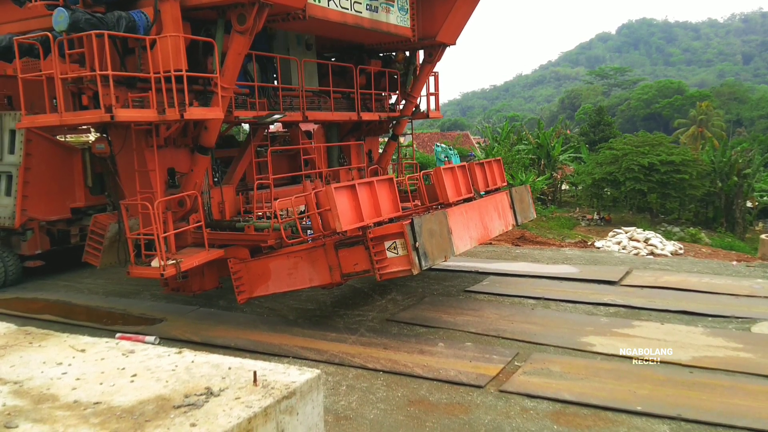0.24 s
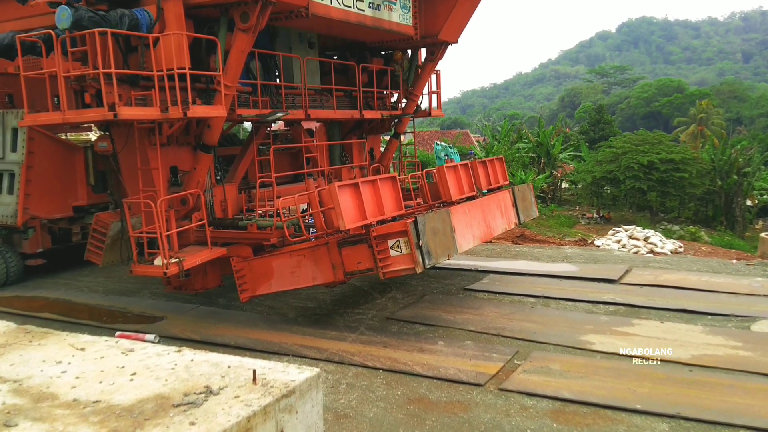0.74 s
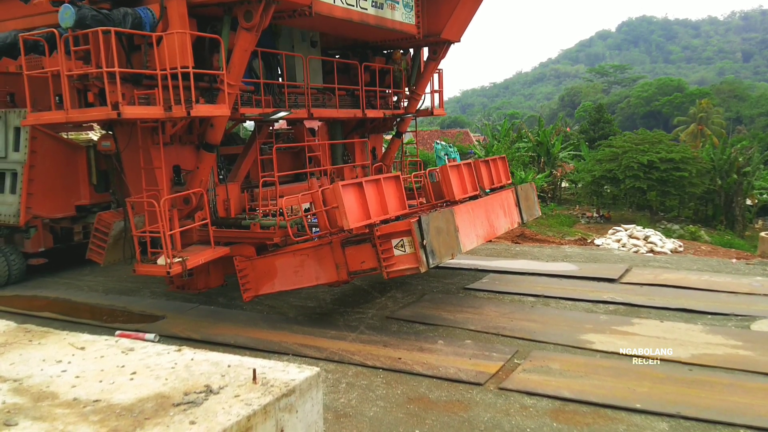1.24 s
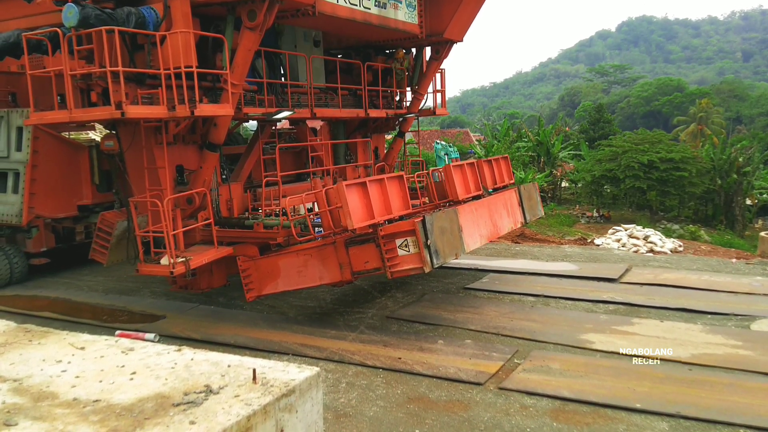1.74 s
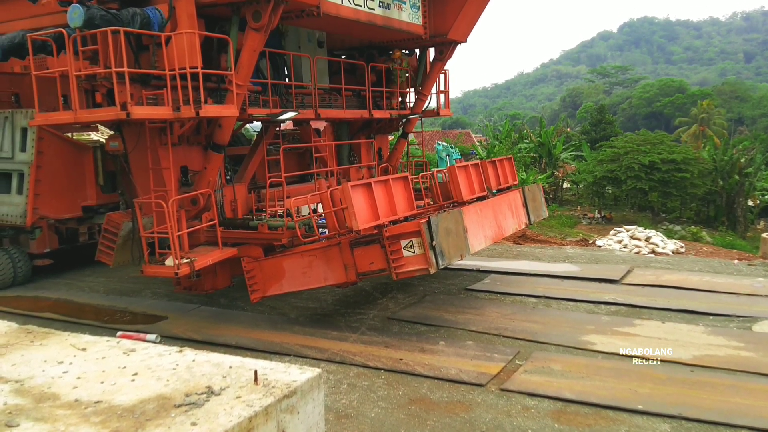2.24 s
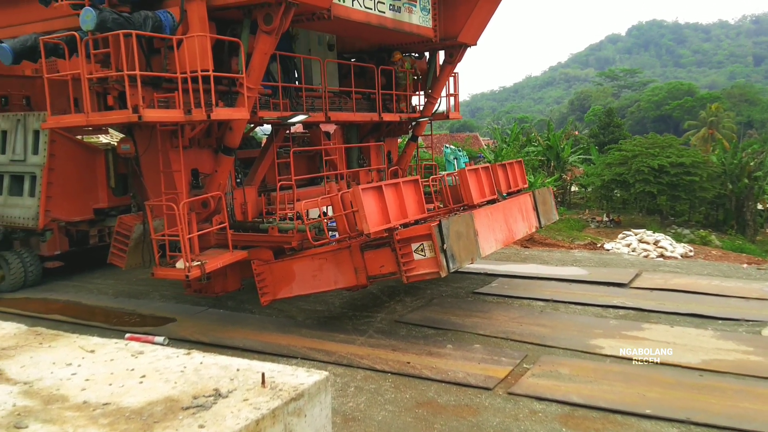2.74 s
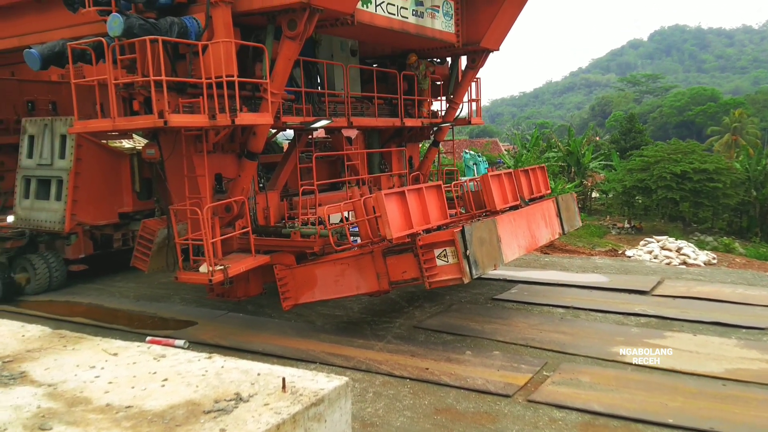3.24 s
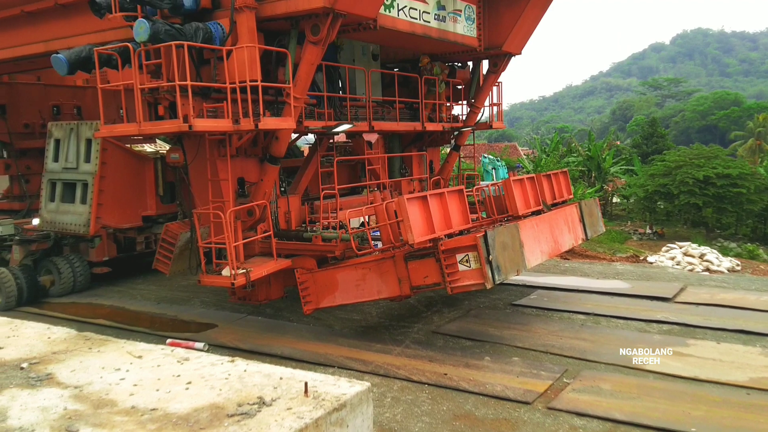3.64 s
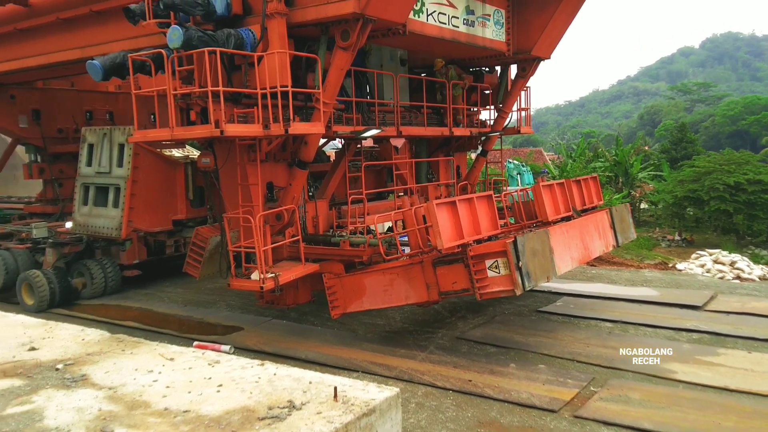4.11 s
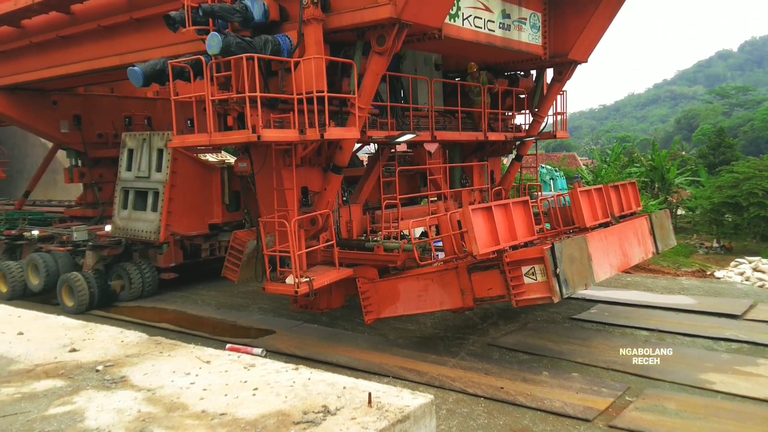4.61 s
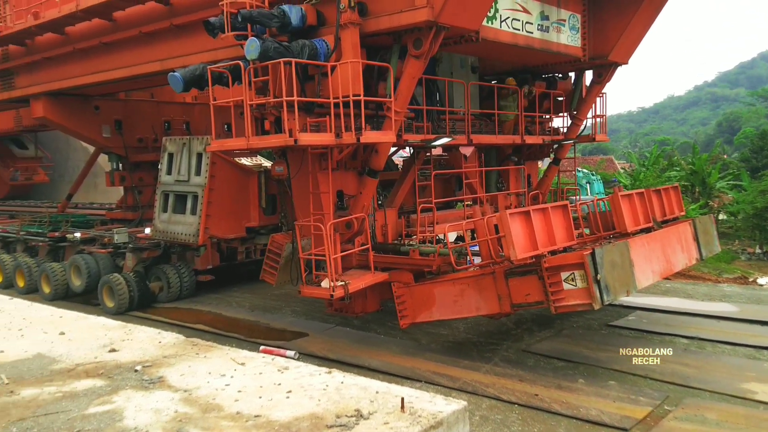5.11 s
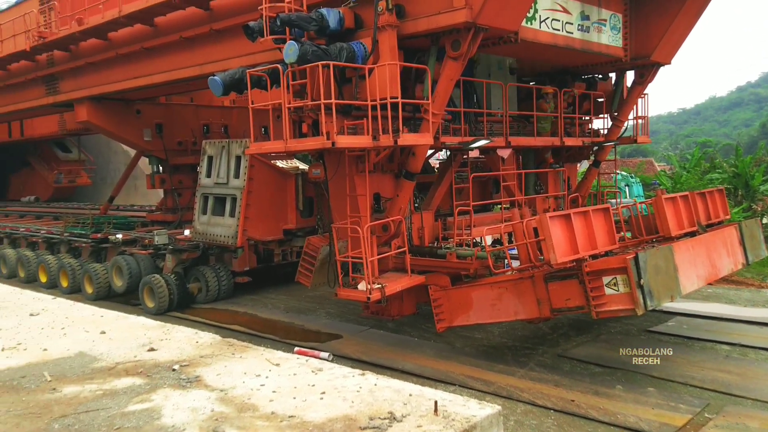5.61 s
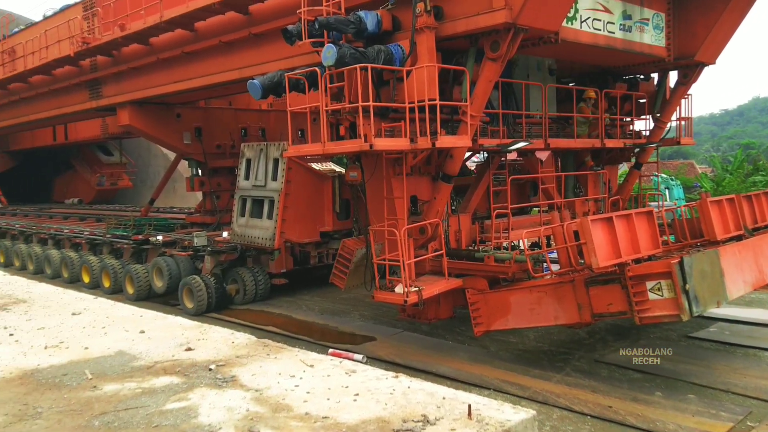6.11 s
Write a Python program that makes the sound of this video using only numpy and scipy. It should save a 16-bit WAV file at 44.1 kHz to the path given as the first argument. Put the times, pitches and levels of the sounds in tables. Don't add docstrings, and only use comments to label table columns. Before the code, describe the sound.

A deep, even engine drone with low rumble, airy roar and soft hiss fills the whole scene, never stopping. Metal panels hum along with it. A high faint squeak and two dull plate knocks come in the first two seconds, the second louder and bigger. Sparse bright chain clinks follow, becoming a busier cluster of clanks in the last second or so. Open air, a close stereo phone microphone, with no distinct echo.

```python
import sys
import numpy as np
from scipy import signal
from scipy.fft import rfft, irfft, next_fast_len
from scipy.io import wavfile
from scipy.ndimage import uniform_filter1d, map_coordinates

SR = 44100
rng = np.random.default_rng(int(sys.argv[2]) if len(sys.argv) > 2 else 0)


def voltage_ratio(decibels):
    exponent = np.asarray(decibels, float) / 20
    return 10 ** exponent


def store_pcm(level_fs):
    pcm = np.round(np.clip(level_fs, -1, 1) * 32767).astype(np.int16)
    wavfile.write(sys.argv[1], SR, np.atleast_2d(pcm).T)


N = 280476

# f/Hz, level/dB per Hz
HISS = [(2200, -36), (3000, -0.5), (3760, -1), (4900, -7.5), (5700, -6.5), (7200, -18.5), (7900, -34),
        (8350, -23.5), (8800, -18.5), (10000, -14.5), (12400, -17.5), (13200, -31), (14400, -40),
        (15100, -37)]


def unit(x):
    return x / np.sqrt(np.mean(x ** 2) + 1e-20)


def along(points, hz):
    f, value = np.transpose(points)
    return np.interp(np.log(hz + 1), np.log(f + 1), value)


def curves(rows):
    s, *columns = np.transpose(rows)
    return [np.interp(np.arange(N) / SR, s, column) for column in columns]


def wobble(rate):
    coarse = np.arange(0, N + 64, 64)
    knots = rng.standard_normal(int(N * rate / SR) + 4)
    return np.interp(np.arange(N), coarse, map_coordinates(knots, [coarse * rate / SR]))


def hump(start, end):
    progress = np.clip((np.arange(N) / SR - start) / (end - start), 0, 1)
    return np.sin(np.pi * progress) ** 0.41


def swelling(start, end, hz, db, rate):
    t = np.arange(N) / SR
    level = hump(start, end) * voltage_ratio(db + 0.53 * wobble(rate))
    return np.sqrt(2) * level * np.sin(2 * np.pi * hz * t + 0.5 * wobble(2 * rate))


def filtered(x, response):
    m = next_fast_len(x.shape[-1] + SR // 2)
    spectrum = rfft(x, m) * response(np.fft.rfftfreq(m, 1 / SR))
    return irfft(spectrum, m)[..., :x.shape[-1]]


def resonances(modes):
    def response(f):
        total = 0
        for k, (center, width, db) in enumerate(modes):
            damping = 1j * f * width
            total = total + (-1) ** k * voltage_ratio(db) * damping / (center ** 2 - f ** 2 + damping)
        return total
    return response


def rush(spectrum, patchy_db):
    z = signal.stft(rng.standard_normal((2, N)), nperseg=512)[2]
    patches = uniform_filter1d(rng.standard_normal(z.shape[1:]), 8, 0)
    patches = uniform_filter1d(patches, 10, 1)
    pair = signal.istft(z * voltage_ratio(patchy_db * unit(patches)), nperseg=512)[1][:, :N]
    return unit(filtered(pair, lambda hz: voltage_ratio(along(spectrum, hz))))


def ports(pair, lag):
    # f/Hz, likeness/0-1
    alike = [(60, 0.99), (170, 0.99), (400, 0.95), (500, 0.68), (650, 0.98), (1150, 0.74), (1450, 0.91),
             (1950, 0.51), (2250, 0.67), (2650, 0.081), (3700, 0.26), (5000, 0.14), (5600, 0.2),
             (7000, 0.033)]
    # f/Hz, level/dB
    shade = [(60, -0.1), (400, -1.7), (700, -0.5), (1000, 2), (1600, 2.5), (2000, -1), (2400, -3.5),
             (3000, 0.7), (3700, 3), (4700, 5), (5500, 6), (6300, -4), (8000, 2), (11000, 2.1)]
    # f/Hz, phase/rad
    lead = [(0, 0), (170, -.04), (350, -.27), (690, -.66), (950, -1.65), (1460, -2.95), (2330, -6.3),
            (3000, -9.3), (3700, -11.9), (5680, -17.4), (16000, -48)]

    def mixing(hz):
        angle = np.arccos(np.clip(along(alike, hz), 0, 1)) / 2
        return np.array([np.cos(angle), np.sin(angle)])

    def sides(hz):
        half = voltage_ratio(along(shade, hz) / 2) * np.exp(0.5j * lag * np.interp(hz, *np.transpose(lead)))
        return np.array([half, 1 / half])

    direct, scattered = filtered(pair, mixing)
    return filtered(np.array([direct + scattered, direct - scattered]), sides)


def turning(heard):
    at = np.arange(N)
    lost = 0.9 * np.maximum(at / SR - 3.2, 0)
    left = map_coordinates(heard[0], [at + lost / 2], order=3, mode="nearest")
    right = map_coordinates(heard[1], [at - lost / 2], order=3, mode="nearest")
    return np.array([left, right])


def bearing():
    # start/s, end/s, f/Hz, level/dB rms, left over right/dB
    whistles = [
        (.97, 1.24, 6170, -50, 0),
        (.84, 1.62, 6170, -56, -3),
        (1.7, 2.3, 5940, -57, -4),
        (3.7, 4.5, 5990, -57, -4),
        (3.3, 3.7, 7220, -61, 3),
    ]
    out = np.zeros((2, N))
    for start, end, hz, db, pan_db in whistles:
        out += swelling(start, end, hz, db, rate=11) * voltage_ratio([[pan_db / 2], [-pan_db / 2]])
    return out


def chains():
    # t/s, level/dB rms, part (row of links)
    clinks = [(2.322, -36, 0), (2.584, -36, 0), (2.947, -37.5, 0), (3.505, -37, 0), (3.598, -38, 0),
              (3.99, -35, 0), (4.008, -37, 0), (4.762, -42, 3), (5.256, -36, 3), (5.258, -29.5, 2),
              (5.423, -38, 1), (5.425, -32, 2), (5.43, -38, 3), (5.51, -35, 3), (5.512, -41, 1),
              (5.716, -35.5, 3), (5.718, -30.5, 2), (6.105, -40, 3), (6.264, -30.5, 2)]
    # f/Hz, width/Hz, spray/dB, t60/s
    links = [
        (3700, 260, -3, .13),
        (5150, 450, -2, .1),
        (2450, 600, -10, .15),
        (3400, 1000, 2, .13),
    ]
    out, t = np.zeros((2, N + SR)), np.arange(SR // 4) / SR
    for s, db, part in clinks:
        hz, width, spray_db, t60 = links[part]
        link = resonances([(hz, width, 0)])
        body = unit(filtered(rng.standard_normal((2, len(t))), lambda f: link(f) ** 2))
        spray = unit(filtered(rng.standard_normal((2, len(t))), lambda f: voltage_ratio(along(HISS, f))))
        onset = 1 - np.exp(-t / 0.001)
        fade_db = -60 * np.maximum(t - 0.012, 0) / t60
        shape = onset * voltage_ratio(db + 2.5 + fade_db)
        out[:, round(s * SR):][:, :len(t)] += shape * (body + voltage_ratio(spray_db) * spray)
    return out[:, :N]


def plates():
    # f/Hz, width/Hz, level/dB
    plate_modes = [
        [(300, 60, 4), (450, 60, -3), (640, 90, 1.5), (790, 110, 1)],
        [(190, 35, 4), (320, 50, 2), (450, 90, 4.5), (750, 120, -3), (1020, 90, -4), (1210, 45, -1.5),
         (1480, 90, -8), (2140, 150, -3), (2500, 180, -2)],
    ]
    # t/s, level/dB, plate, share of the lag between ports
    slaps = [
        (1.091, -13, 0, 1),
        (1.736, -9.5, 1, .5),
    ]
    # delay/s, level/dB, rattle t60/s
    bounces = [
        (0, .5, .13),
        (.015, -2, .18),
        (.032, -5.5, .26),
        (.052, -8, .4),
    ]
    out, t = np.zeros((2, N + SR)), np.arange(SR // 3) / SR
    for s, db, plate, lag in slaps:
        modes = resonances(plate_modes[plate])
        for late, less_db, t60 in bounces:
            rattle = rng.standard_normal((2, len(t))) * voltage_ratio(-60 * t / t60)
            rattle[0, 0] += 20
            ring = filtered(rattle, lambda hz: modes(hz) / (1 + 1j * hz / 3000) ** 3)
            ring = ring / np.std(ring[0, :SR // 50])
            knock = voltage_ratio(db + less_db - 2.5) * ports(ring, lag)
            out[:, round((s + late) * SR):][:, :len(t)] += knock
    return out[:, :N]


def frame():
    # start/s, end/s, f/Hz, level/dB rms
    hums = [
        (.1, 1.25, 158, -22.5),
        (1.2, 2.4, 162.6, -21),
        (2.9, 5.6, 162.6, -26),
        (-1, 7.4, 193.6, -31),
        (2.6, 3.35, 229, -25),
        (5.3, 6.15, 215, -24),
        (1, 6.36, 461, -39),
        (0, .5, 670, -30),
    ]
    return sum(swelling(*hum, rate=3) for hum in hums)


def airflow(crank):
    # f/Hz, level/dB per Hz
    rumble_spectrum = [(20, -40), (30, -11), (44, -9.5), (60, -2.5), (110, -3), (140, -5.5), (180, -3),
                       (220, -2.5), (300, -7.5), (420, -50)]
    # f/Hz, level/dB per Hz
    roar_spectrum = [(200, -20), (300, -1.5), (400, -2.5), (550, -1), (760, -3.5), (880, -8), (1340, -6.5),
                     (1670, -6), (1950, -12), (2270, -11), (2900, -21), (3600, -80)]
    # t/s, effort/dB
    effort = [(0, 2), (.46, -0.1), (.9, 0), (1.35, -0.86), (2.0, -.8), (2.8, -0.4), (3.2, 0.1), (4.2, 0.73),
              (4.64, -1), (5.45, 0.5), (6.36, 0)]
    effort_db, = curves(effort)
    surge = wobble(7) + 1.03 * wobble(16)
    firing = np.cos(8 * crank) + 0.69 * np.cos(crank)
    rumble_db = -18.5 + 0.77 * effort_db + 0.22 * wobble(2.87)
    roar_db = -19.5 + effort_db + 0.5 * surge + 0.48 * wobble(28) + 0.14 * firing
    hiss_db = -34 + 1.35 * effort_db + 0.28 * surge + 0.24 * wobble(18) + 0.24 * firing
    rumble = voltage_ratio(rumble_db) * rush(rumble_spectrum, patchy_db=1.5)
    roar = voltage_ratio(roar_db) * rush(roar_spectrum, patchy_db=0.5)
    hiss = voltage_ratio(hiss_db) * rush(HISS, patchy_db=0.5)
    return rumble + roar + hiss


def orders(table, crank, boom_db, rest_db, waver_db, drift):
    out = np.zeros(N)
    for order, db in table:
        if order == 5:
            level_db, phase = db + boom_db, 0
        else:
            level_db = db + rest_db + waver_db * np.sqrt(order / 8) * wobble(2.514)
            phase = rng.uniform(0, 2 * np.pi) + drift * order * wobble(2.854)
        out += np.sqrt(2) * voltage_ratio(level_db) * np.sin(order * crank + phase)
    return out


def engines():
    # multiple of the cycle, level/dB rms
    main_orders = [(3, -40), (4, -48), (5, -29.5), (6, -34.5), (7, -22), (8, -20), (9, -41), (10, -30),
                   (12, -32), (14, -31.5), (17, -38.5), (18, -42), (19, -37.5), (20, -36.5), (24, -31.5),
                   (25, -36.5), (26, -32), (30, -38.5), (32, -42.5), (34, -34), (40, -37), (48, -38),
                   (51, -43.5)]
    # multiple of the cycle, level/dB rms
    aux_orders = [(3, -49), (4, -32), (5, -16), (6, -32), (7, -33.5), (8, -34.5), (9, -69), (12, -31.5),
                  (13, -33.5), (37, -46.5)]
    # t/s, share/0-1
    handover = [
        (0, 0),
        (1.2, 0),
        (2.8, 0.5),
        (4.3, 0.54),
        (5, 1),
        (6.36, 0.9),
    ]
    # start/s, end/s, cycle off the set speed/Hz, boom lost/dB
    hunting = [
        (-.5, .52, -.47, 0),
        (.52, 1.32, .18, 0),
        (4.4, 5.1, .04, 6),
        (5.0, 5.8, -.175, 5.5),
        (5.8, 7, 0, 2.5),
    ]
    main_hz, aux_hz = 13.0, 12.52
    cancel_s = 5.08
    share, = curves(handover)
    main_rest_db = -2.5 + 2.5 * share
    main_boom_db = -16 + 20.5 * share
    aux_boom_db = 1.5
    for start, end, off_hz, lost_db in hunting:
        swing = hump(start, end)
        aux_hz = aux_hz + off_hz * swing
        aux_boom_db = aux_boom_db - lost_db * swing
    main_crank = 2 * np.pi * main_hz * (np.arange(N) / SR - cancel_s)
    aux_crank = 2 * np.pi * np.cumsum(aux_hz) / SR
    aux_crank += np.pi / 5 - aux_crank[round(cancel_s * SR)]
    main = orders(main_orders, main_crank, main_boom_db, main_rest_db, waver_db=1.5, drift=0.0088)
    aux = orders(aux_orders, aux_crank, aux_boom_db, 1.5, waver_db=1.0, drift=0.016)
    return main + aux, main_crank


def scene():
    tones, crank = engines()
    tones = tones + frame()
    scattered_tones = 1.17 * np.roll(tones, 300)
    field = airflow(crank) + chains() + np.array([tones, scattered_tones])
    return turning(ports(field, 1)) + plates() + bearing()


def low_pass(x):
    return signal.sosfilt(signal.butter(12, 15250, fs=SR, output="sos"), x)


def record(dry):
    mix = dry / (1 + np.abs(dry) ** 8) ** (1 / 8)
    mix = filtered(mix, lambda hz: hz < 15130)
    return low_pass(mix)


dry = scene()
out = record(dry)
store_pcm(out)
```